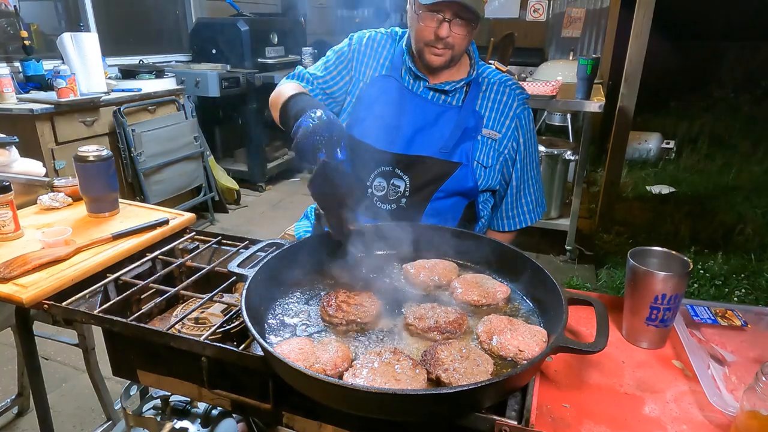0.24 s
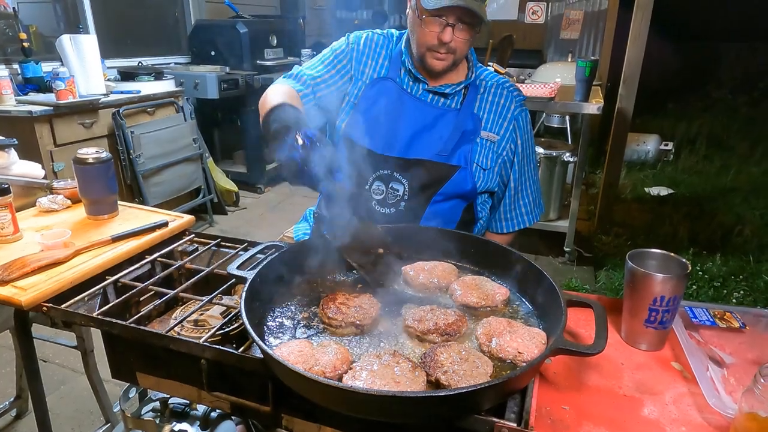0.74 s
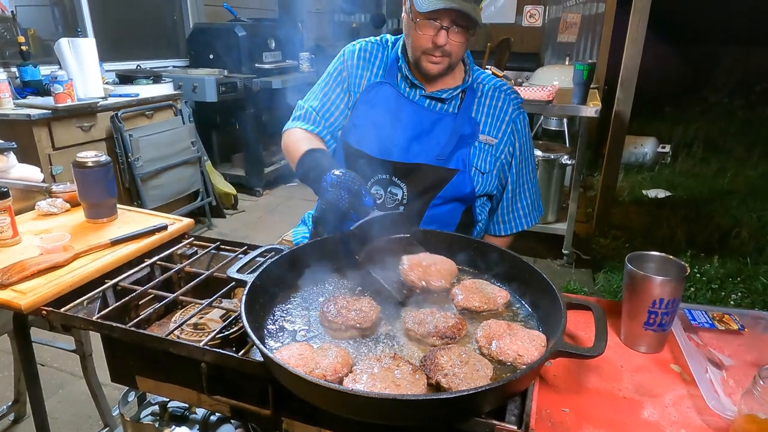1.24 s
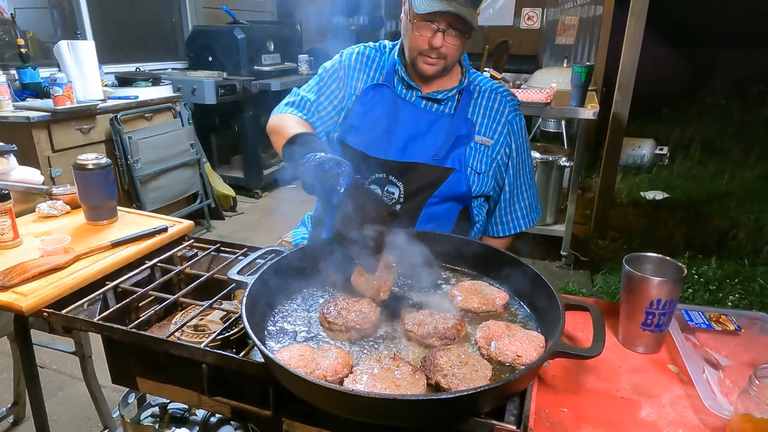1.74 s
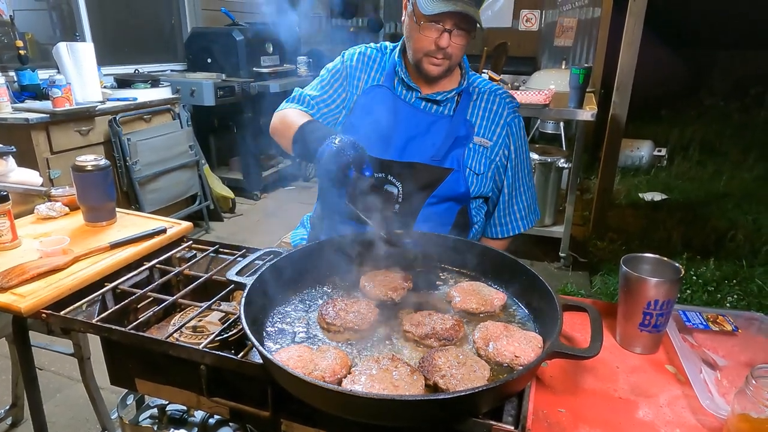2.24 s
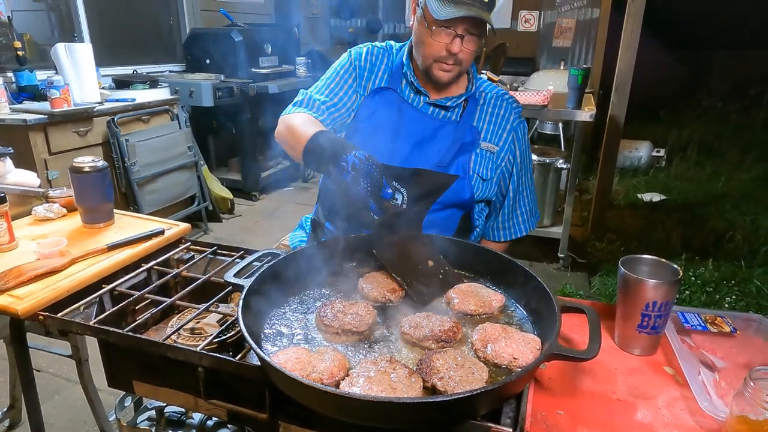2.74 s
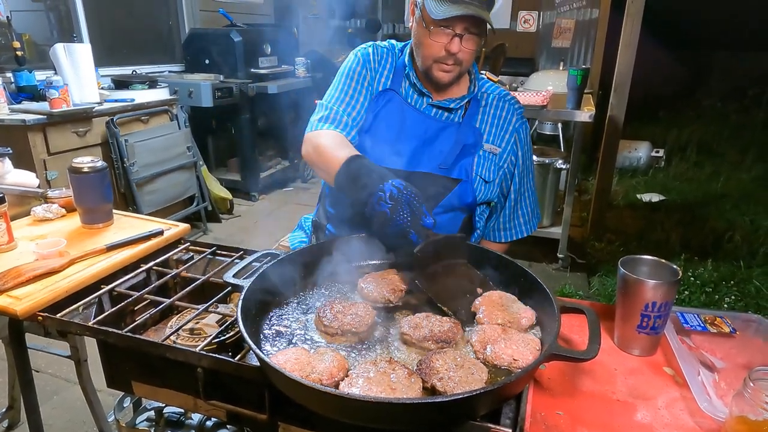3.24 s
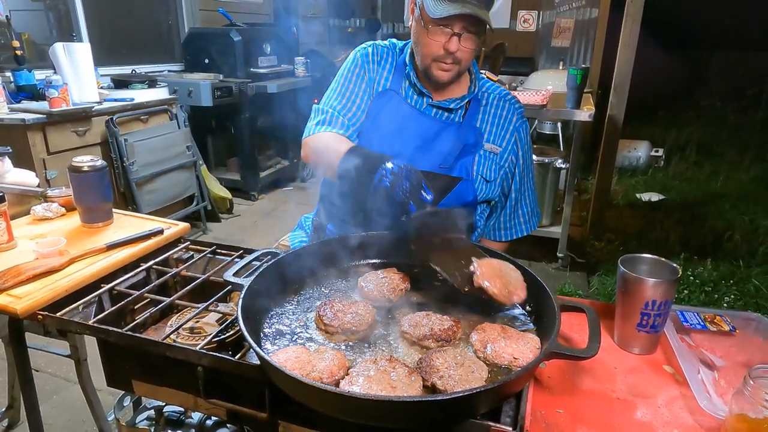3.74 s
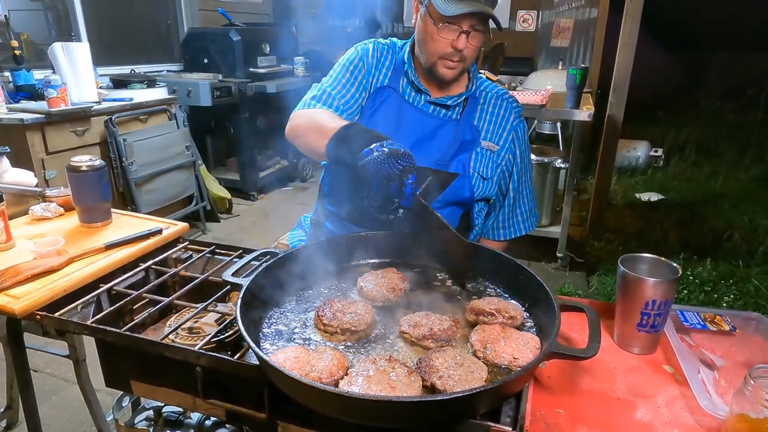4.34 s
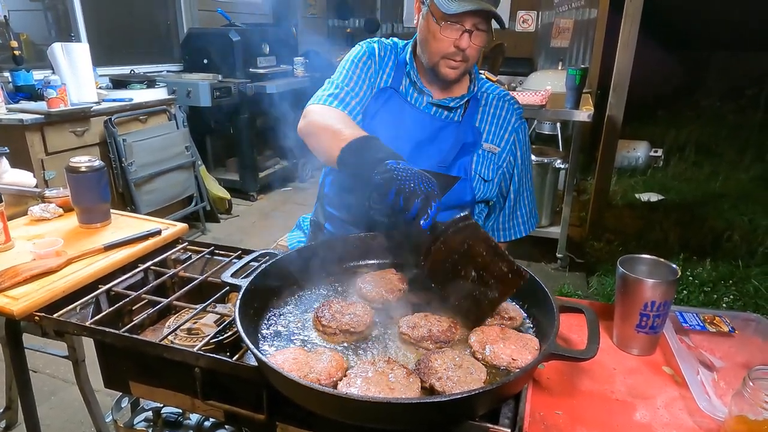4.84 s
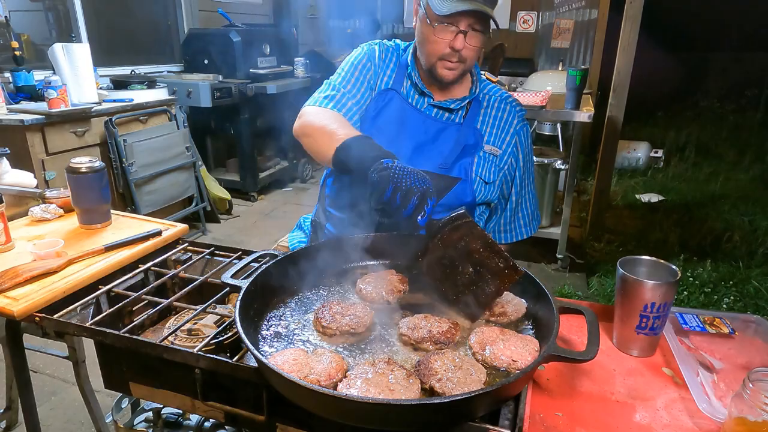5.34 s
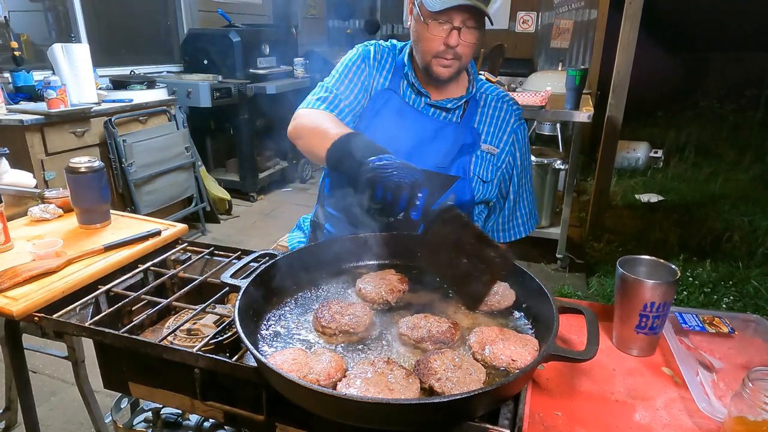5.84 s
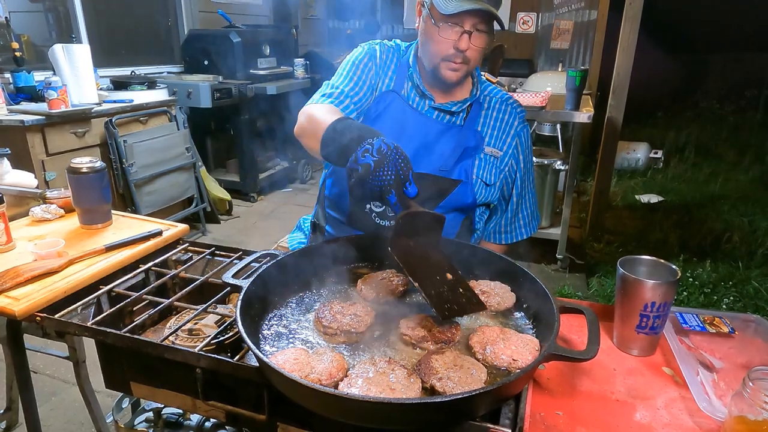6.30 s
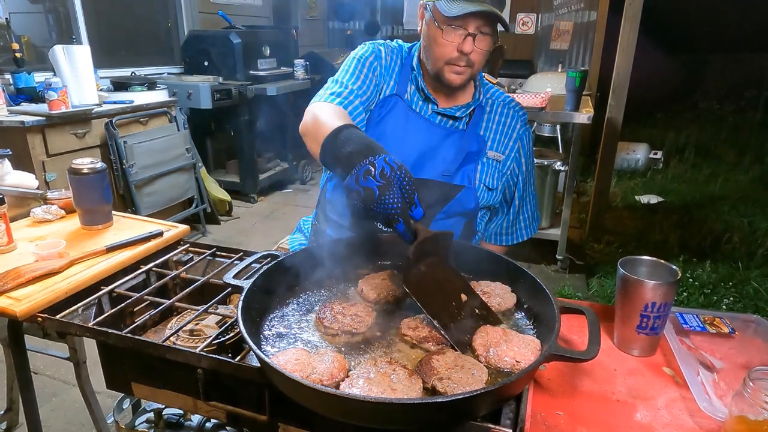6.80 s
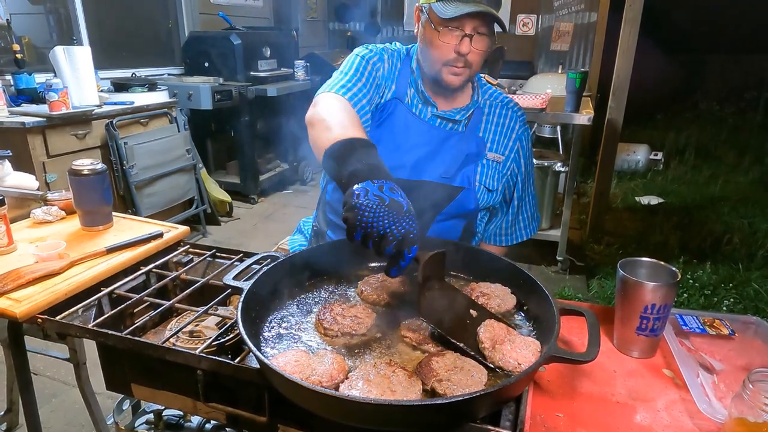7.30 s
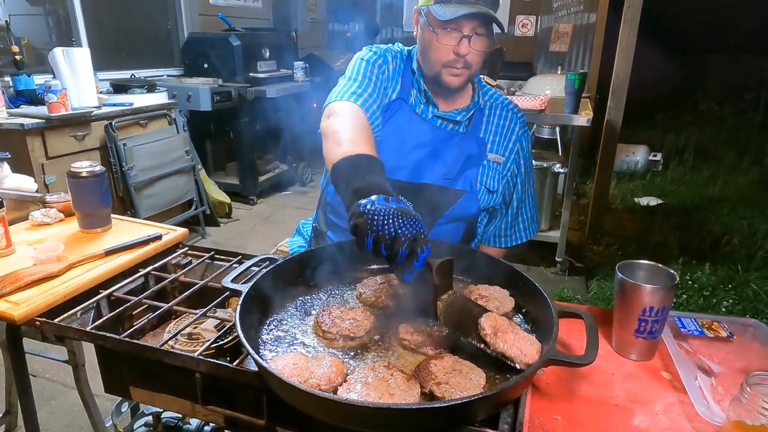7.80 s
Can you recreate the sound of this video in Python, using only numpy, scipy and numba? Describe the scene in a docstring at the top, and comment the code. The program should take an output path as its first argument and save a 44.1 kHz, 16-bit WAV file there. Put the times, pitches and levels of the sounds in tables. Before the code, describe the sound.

Burger patties sizzle steadily in a wide iron skillet while a metal spatula clanks, scrapes and briefly squeals against the pan, close up outdoors.

```python
"""Under a porch roof, patties sizzle in a wide iron skillet over a gas burner, close to a small camera.
The sizzle is patchy noise, clicks and damped-sine bubbles; noise through the pan's modes is a low drone.
A steel spatula taps and scrapes: blows and stuttering grit ring modes of pan and blade, and the porch answers.
The camera's microphone cuts the bass, notches the treble and turns down loud sound slowly and quickly."""
import sys
import numpy as np
from scipy import signal
from scipy.fft import rfft, irfft, next_fast_len
from scipy.io import wavfile
from scipy.ndimage import uniform_filter1d, map_coordinates
from numba import njit

SR = 44100
rng = np.random.default_rng(int(sys.argv[2]) if len(sys.argv) > 2 else 0)


def log_audio(samples):
    """Write samples as a 16-bit WAV file to the path given in sys.argv[1]."""
    # one column per channel
    frames = np.atleast_2d(samples).T
    # limit to full scale, then quantise
    limited = np.clip(frames, -1, 1)
    pcm = np.round(limited * 32767).astype(np.int16)
    wavfile.write(sys.argv[1], SR, pcm)


N = 355446
STEP = 64  # samples for each value of a slow control

# All source levels are as they stand before the microphone.

# course of the frying: (time [s], fat sizzle level [dB], pan drone level [dB])
FRYING_LEVELS = [(0, -12, -32), (.7, -15.5, -28.5), (1.1, -16, -33.5), (1.4, -16, -35), (2.0, -15.5, -34.5),
                 (2.7, -15.5, -32), (3.4, -16.5, -33), (4.1, -15, -33.5), (5.3, -14.5, -31.5),
                 (6.3, -14.5, -33), (7.1, -16, -28.5), (7.7, -16.8, -33), (8.06, -16.5, -35.5)]
# colour of the fat sizzle: (frequency [Hz], density [dB per Hz])
FAT_COLOUR = [(30, -22), (150, -13), (400, -30.5), (917, -19), (1410, -13.5), (2000, -8), (2650, -3),
              (3660, 0.5), (5000, -2.5), (6890, -8.5), (8500, -21.5), (10000, -19), (11700, -16),
              (13000, -29), (14900, -73)]
# modes of the iron pan: (frequency [Hz], width at damping 1 [Hz], relative level [dB])
PAN_MODES = [(376, 28.6, -3), (553, 10.3, -0.5), (641, 39, -1), (757, 30.5, 0.5), (820.4, 17.3, 5.5)]


def frying():
    """Fat hisses, crackles and bubbles over a low drone of noise through the pan's modes."""
    fat_db, drone_db = curves(FRYING_LEVELS)

    boil_db = 0.37 * wobble(4.97) + 0.37 * wobble(18)
    crackling = amp(-6) * crackle(share=0.03, spread_db=2.8)
    hiss = unit(patchy(depth_db=0.9)) + crackling
    fat = unit(filtered(hiss * amp(boil_db), lambda hz: amp(along(FAT_COLOUR, hz))))
    fat = fat + amp(-9.5) * bubbles(count=16000, centre_hz=4280, cycles=2.7, spread_db=2.0)

    uneven_noise = patchy(depth_db=0.5) * amp(1.35 * wobble(12))
    drone = unit(filtered(uneven_noise, ringing(PAN_MODES, damping=1.93)))
    return amp(fat_db) * fat + amp(drone_db) * drone


def crackle(share, spread_db):
    """Single clicks of either sign on a share of the samples, a few bigger than the rest."""
    chance, size, sign = rng.random((3, N))
    height = amp(-spread_db * np.log(size + 0.0067))
    return unit((chance < share) * height * np.sign(sign - 0.5))


def bubbles(count, centre_hz, cycles, spread_db):
    """Tiny steam bubbles, each a damped sine that falls to 1/e in the given number of cycles."""
    place_and_size = rng.random((count, 2))
    pitch = np.clip(rng.standard_normal((count, 1)), -1.8, 2.5)
    hz = centre_hz * np.exp(0.31 * pitch)
    k = np.arange(192)  # samples within one bubble
    wave = np.sin(2 * np.pi * hz * k / SR) * np.exp(-hz * k / SR / cycles)
    wave *= amp(-spread_db * np.log(place_and_size[:, 1:] + 0.0077))
    at = (place_and_size[:, :1] * N).astype(int) + k
    return unit(np.bincount(at.ravel(), wave.ravel(), N + len(k))[:N])


# spatula strokes: (start [s], length before the lift [s], pan level [dB], pan centre [Hz],
#                   lowest pan mode level [dB], blade level [dB], blade centre [Hz])
SCRAPES = [(.755, .14, -18.5, 685, -31, -20.5, 1075), (.89, .05, -17, 710, -34, -16.5, 1085),
           (.96, 0.043, -27, 760, -39, -28, 1300), (1.022, 0.053, -28, 580, -40, -36, 1200),
           (1.663, .07, -28, 594, -27.5, -31, 1120), (1.77, 0.21, -33, 820, -40, -48, 1200),
           (2.65, .12, -29, 733, -35.5, -35, 1100), (2.788, 0.037, -23.5, 780, -40, -27, 1100),
           (2.821, 0.056, -21, 670, -24, -12.5, 1100), (2.868, 0.058, -17.5, 665, -34, -13, 1290),
           (2.93, 0.047, -18.5, 780, -34, -27, 1340), (3.184, .15, -29.5, 720, -35, -37, 1250),
           (5.748, .14, -40, 654, -49, -31.5, 1085), (6.793, .13, -25, 756, -31.5, -29, 1280),
           (7.193, 0.065, -20.5, 760, -24, -25.5, 1200), (7.266, 0.085, -26, 770, -27, -34, 1250),
           (7.483, 0.16, -25, 740, -39, -36, 1220)]
# the edge squeals when pushed hard: (start [s], length before the lift [s], level [dB], centre [Hz])
EDGE_SQUEALS = [(0.828, 0.11, -16.5, 2080), (2.82, 0.1, -13.5, 2660), (2.91, .055, -23.5, 2070),
                (5.705, .03, -20, 1880)]
# modes of the steel blade: (frequency [Hz], width at damping 1 [Hz], relative level [dB])
BLADE_MODES = [(1082, 22, 0), (1190, 19, -1), (1299, 91, 5), (1455.5, 13.6, 0.5)]
# modes of the blade's edge: (frequency [Hz], width at damping 1 [Hz], relative level [dB])
EDGE_MODES = [(1825, 30, -11), (2046, 50, -0.5), (2245, 58, -14), (2640, 80, -7.5), (2664, 47, -2)]
# the broad rasp of steel on iron: (frequency [Hz], width [Hz], relative level [dB])
RASP_MODE = [(1800, 590, 0)]


def strokes():
    """Scraping rings the pan, the blade and its edge."""
    start, length, pan_db, pan_hz, low_db, blade_db, blade_hz = np.transpose(SCRAPES)
    push = pressure(start, length)
    pan = rubbed(PAN_MODES[1:], push, pan_db, pan_hz, octaves=0.15)
    low = rubbed(PAN_MODES[:1], push, low_db, pan_hz, octaves=1)
    blade = rubbed(BLADE_MODES, push, blade_db, blade_hz, octaves=0.07)
    rasp = rubbed(RASP_MODE, push, blade_db, blade_hz, octaves=1)

    start, length, edge_db, edge_hz = np.transpose(EDGE_SQUEALS)
    edge = rubbed(EDGE_MODES, pressure(start, length), edge_db, edge_hz, octaves=0.07)
    return pan + low + blade + edge + amp(-5) * rasp


def pressure(start, length, settle_s=0.033, lift_t60_s=0.13):
    """Push of the blade, one row a stroke: it settles softly on the iron, holds, then lifts away."""
    t = np.arange(0, N, STEP) / SR - start[:, None]
    rise = np.sin(np.pi / 2 * np.clip(t / settle_s, 0, 1)) ** 2
    since_lift = np.clip(t - length[:, None], 0, 1)
    return rise * amp(-60 * since_lift / lift_t60_s)


def rubbed(modes, push, level_db, centre_hz, octaves):
    """Grit drives the modes near the centre of the strongest stroke."""
    force = push * amp(level_db)[:, None]
    strongest = np.argmax(force, axis=0)
    drift_octaves = 0.048 * wobble(20)[::STEP]  # the contact point drifts over the pan
    centre_hz = uniform_filter1d(centre_hz[strongest], size=12) * 2 ** drift_octaves

    shares = np.array(near(modes, centre_hz, octaves)) * amp([[db] for _, _, db in modes])
    shares = shares / np.linalg.norm(shares, axis=0)
    drives = np.repeat(force.sum(axis=0) * shares, STEP, axis=1)[:, :N]
    drives = uniform_filter1d(drives, size=STEP)

    stutter = unit(amp(1.85 * wobble(45)))  # the edge stutters over rough iron
    grit = stutter * rng.standard_normal(N)
    rung = filtered(drives * grit, lambda hz: np.array([ringing([mode])(hz) for mode in modes]))
    return rung.sum(axis=0)


def near(modes, centre_hz, octaves):
    """How strongly each mode is driven: the contact point favours those near the centre."""
    return [np.exp(-0.5 * (np.log2(hz / centre_hz) / octaves) ** 2) + 0.04 for hz, _, _ in modes]


# spatula taps: (time [s], peak level [dB], pan centre [Hz], blade against pan level [dB],
#                damping [factor on the mode widths])
SPATULA_TAPS = [(0.502, 0, 535, -2, 0.91), (0.661, -10.5, 720, -4.5, 1.9), (1.119, -11.5, 746, 2, 2.2),
                (1.27, -14, 807, -5, 1.32), (1.651, -2, 760, -4, 0.9), (5.194, -9.5, 616, -6, 1.6),
                (5.426, -8, 630, -8.5, 2.1), (5.609, -17, 832, -10, 1.05), (5.714, -5.5, 660, -5, 1.2),
                (5.762, -15, 600, -9, 1.8), (5.805, -13, 566, -6, 1.3), (5.978, -12.5, 364, -7, 1.5),
                (6.474, -17, 799, -7, 1.3), (6.656, -7, 617, -4, 1.6), (7.594, -12, 697, -15, 1.4)]


def taps():
    """Each tap is a sharp blow and a short rattle that ring pan and blade, muted by meat and fat."""
    out = np.zeros(N + SR)
    t = np.arange(SR // 2) / SR
    hz = np.fft.rfftfreq(SR, 1 / SR)
    for s, db, centre_hz, blade_db, damping in SPATULA_TAPS:
        contact = 0.059 * rng.standard_normal(len(t)) * amp(-60 * t / 0.13)  # the rattle
        contact[0] = 1  # the blow

        # level trimmed by width, so that wide modes do not drown the narrow ones
        iron = [(f, w, level + 20 * np.log10(drive) - 10 * np.log10(w))
                for (f, w, level), drive in zip(PAN_MODES, near(PAN_MODES, centre_hz, octaves=0.4))]
        steel = [(f, w, level - 20 * np.log10(w) + rng.normal(0, 1.8))
                 for f, w, level in BLADE_MODES + EDGE_MODES[:2]]
        blade = ringing(steel, damping)(hz) + amp(-1) * ringing(RASP_MODE)(hz)
        body = ringing(iron, damping)(hz) + amp(blade_db) * blade

        ring = irfft(rfft(contact, SR) * body, SR)[:len(t)]
        out[round(s * SR):][:len(t)] += amp(db) * ring / np.abs(ring).max()
    return out[:N]


# how long the porch rings: (frequency [Hz], 60 dB decay time [s])
PORCH_DECAY = [(300, 0.23), (2000, 0.9), (8000, 0.18)]


def porch(x):
    """Roof and walls answer; each frequency dies at its own speed."""
    hz, t, z = signal.stft(rng.standard_normal(SR // 2), SR, nperseg=256)
    decay = amp(-60 * t / along(PORCH_DECAY, hz)[:, None])
    tail = signal.istft(z * decay, SR, nperseg=256)[1]
    return signal.fftconvolve(x, tail / np.linalg.norm(tail))[:N]


# colour of the sound that differs between the ports: (frequency [Hz], density [dB per Hz])
SIDE_COLOUR = [(180, -41), (300, -2), (389, -8.5), (949, -9.5), (5840, -7), (7330, -1.5), (9060, -25),
               (11900, 5.5), (12500, 1), (14500, -38)]


def side_sizzle():
    """Patchy noise that follows the sizzle and reaches the two ports with opposite sign."""
    noise = unit(filtered(patchy(depth_db=8), lambda hz: amp(along(SIDE_COLOUR, hz))))
    apart = amp(curves(FRYING_LEVELS)[0] - 23.5) * noise
    return np.array([apart, -apart])


# lean of the sound in front: (frequency [Hz], left minus right level [dB])
SIDE_LEAN = [(7000, 0), (10000, 0.5), (11500, -1.5), (12500, -3.5), (14000, 1)]


def both_ports(x):
    """One sound at both ports; only the high treble leans to one side."""
    halves = np.array([[0.5], [-0.5]])
    return filtered(x, lambda hz: amp(along(SIDE_LEAN, hz) * halves))


def amp(db):
    """Gain of a level in dB."""
    return 10 ** (np.asarray(db) / 20)


def unit(x):
    """Scaled to rms 1."""
    return x / np.sqrt(np.mean(x ** 2) + 1e-20)


def along(points, hz):
    """Value at each frequency, from (Hz, value) points on a log axis."""
    f, v = np.transpose(points)
    return np.interp(np.log(hz + 1), np.log(f + 1), v)


def curves(rows):
    """One value per sample for each column after the time."""
    s, *cols = np.transpose(rows)
    return [np.interp(np.arange(N) / SR, s, c) for c in cols]


def wobble(rate):
    """A smooth random curve, rate knots a second."""
    knots = rng.standard_normal(int(N * rate / SR) + 4)
    return map_coordinates(knots, [np.arange(N) * rate / SR])


def filtered(x, response):
    """x passed through a complex response of frequency."""
    m = next_fast_len(N + SR // 2)
    return irfft(rfft(x, m) * response(np.fft.rfftfreq(m, 1 / SR)), m)[..., :N]


def ringing(modes, damping=1):
    """Causal response of a set of modes, scaled so that white noise keeps its power."""
    def response(f):
        h = 0
        for k, (centre, width, db) in enumerate(modes):
            resonance = 1j * f * width / (centre * centre - f * f + 1j * f * width * damping)
            h = h + (-1) ** k * amp(db) * resonance  # neighbours alternate in sign
        return h / np.sqrt(np.mean(np.abs(h) ** 2))
    return response


def patchy(depth_db):
    """White noise with soft patches of more and less level in time and frequency."""
    z = signal.stft(rng.standard_normal(N), nperseg=256)[2]
    field = uniform_filter1d(rng.standard_normal(z.shape), size=5, axis=0)
    field = uniform_filter1d(field, size=12, axis=1)
    return signal.istft(z * amp(depth_db * unit(field)), nperseg=256)[1][:N]


def scene():
    """The pan sits in front of both ports, with the porch behind the spatula."""
    spatula = strokes() + taps()
    front = frying() + spatula + amp(-14.5) * porch(spatula)
    return both_ports(front) + side_sizzle()


def microphone(hz, cut_hz=330, leak_db=-40, notch_hz=9080, width_hz=450):
    """A steep bass cut with a faint leak, and a deep notch."""
    s = 1j * hz / cut_hz
    cut = np.abs(s * s / (s * s + 1.059 * s + 1)) ** 9 + amp(leak_db)  # nine stages, no delay
    off_notch = notch_hz ** 2 - hz ** 2
    return cut * (off_notch / (off_notch + 1j * hz * width_hz)) ** 2


@njit
def follow(power, attack, release):
    """Running power, with one rate for rising and one for sinking."""
    out = np.empty_like(power)
    state = power[:4096].mean()
    for i in range(len(power)):
        state += (attack if power[i] > state else release) * (power[i] - state)
        out[i] = state
    return out


def turned_down(x, attack_s, release_s, threshold_db, share):
    """Gain falls by a share of the level over the threshold."""
    power = np.abs(uniform_filter1d(np.mean(x ** 2, axis=0), size=512))
    level_db = 10 * np.log10(follow(power, 1 / (attack_s * SR), 1 / (release_s * SR)) + 1e-12)
    return x * amp(-share * np.maximum(level_db - threshold_db, 0))


# the camera's slow gain control: (attack [s], release [s], threshold [dB], share of excess removed [0-1])
SLOW_CONTROL = (0.18, 0.5, -19.5, 0.5331)
# the camera's fast gain control: (attack [s], release [s], threshold [dB], share of excess removed [0-1])
FAST_CONTROL = (0.05, 0.05, -17.5, 0.55)


def record(dry):
    """Microphone colour, slow and fast gain control, softly squashed peaks, band limit."""
    x = filtered(dry, microphone)
    x = turned_down(x, *SLOW_CONTROL)
    x = turned_down(x, *FAST_CONTROL)
    x = x / (1 + np.abs(x / 0.85) ** 6) ** (1 / 6)  # soft ceiling at 0.85, ahead of the band limit
    return filtered(x, lambda hz: hz < 14620)


dry = scene()
out = record(dry)
log_audio(out)
```